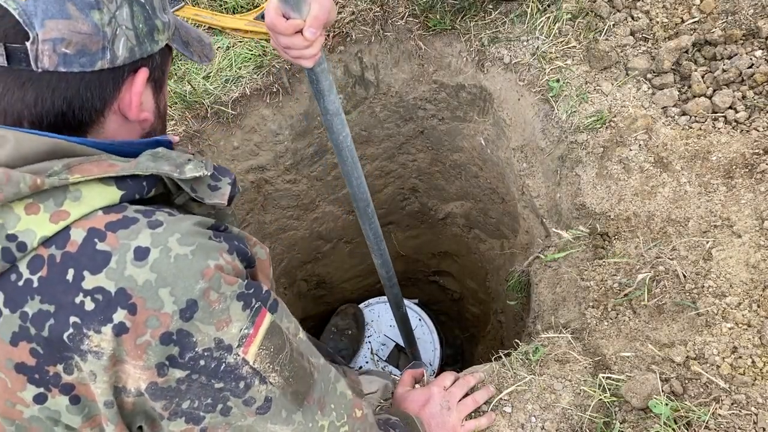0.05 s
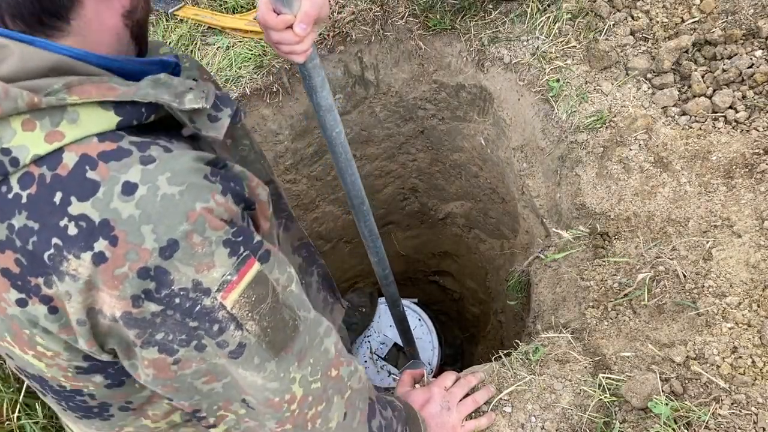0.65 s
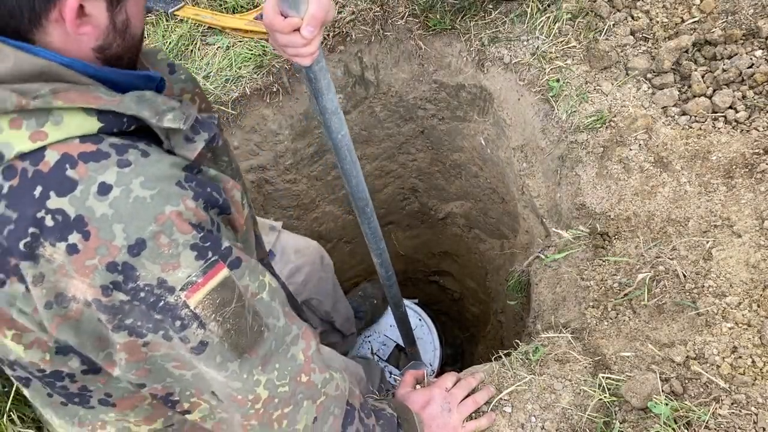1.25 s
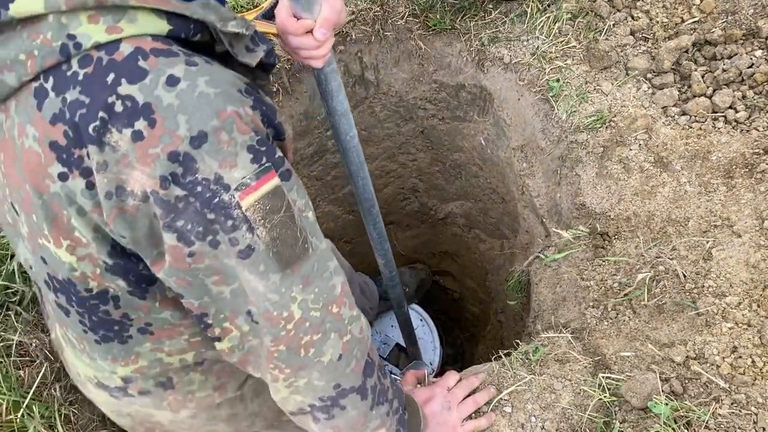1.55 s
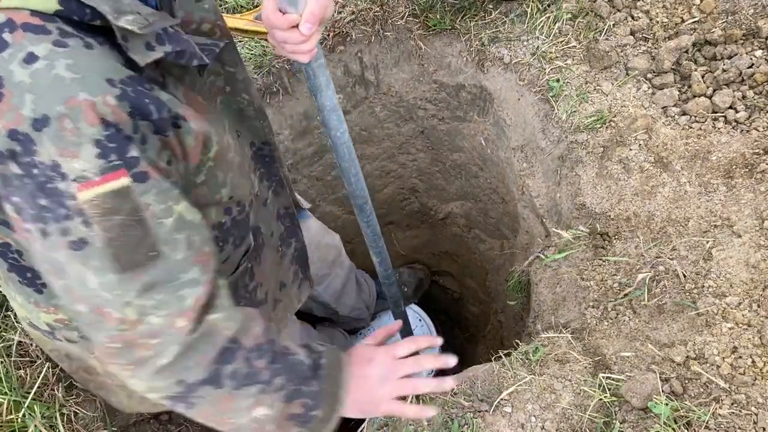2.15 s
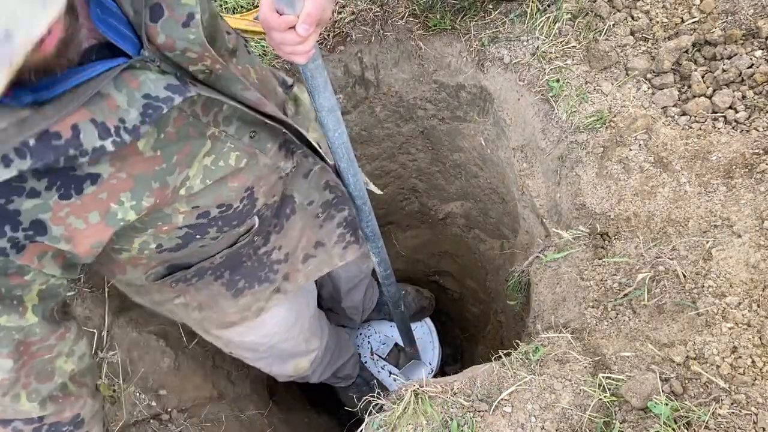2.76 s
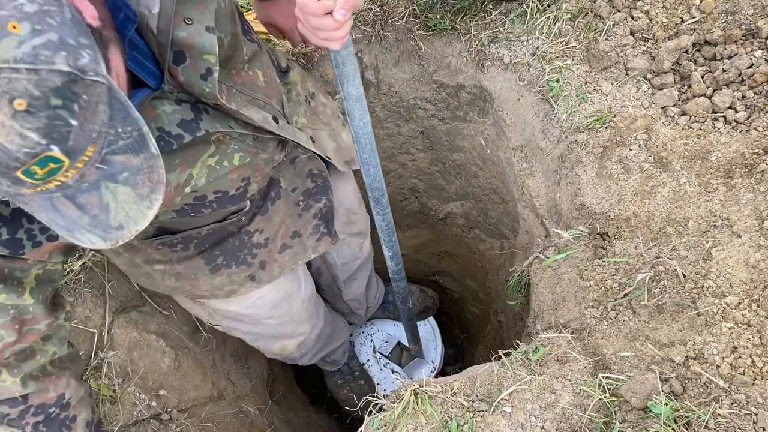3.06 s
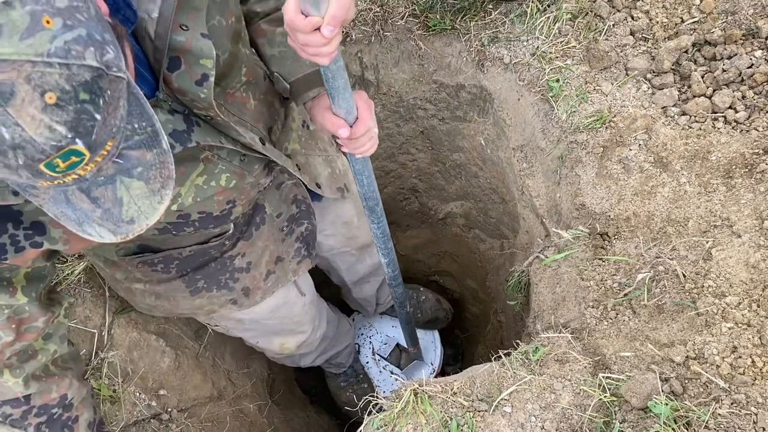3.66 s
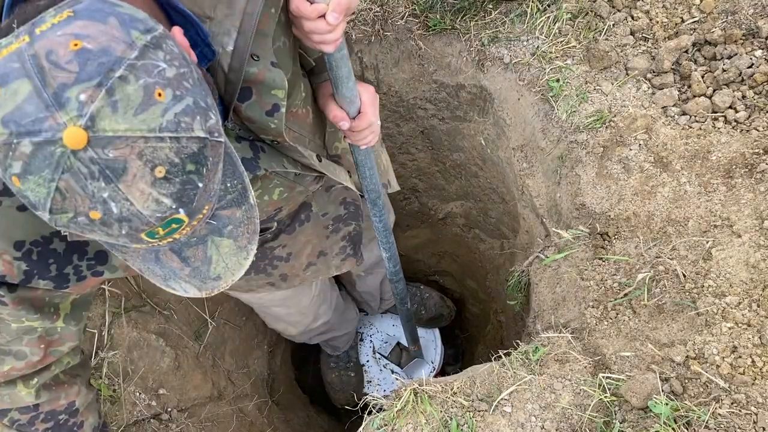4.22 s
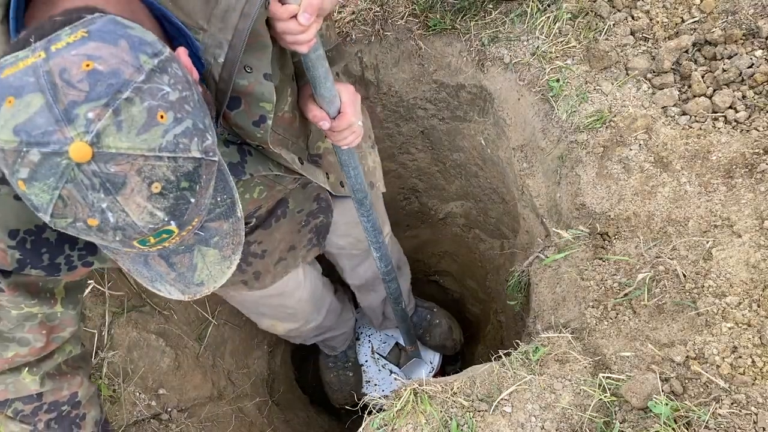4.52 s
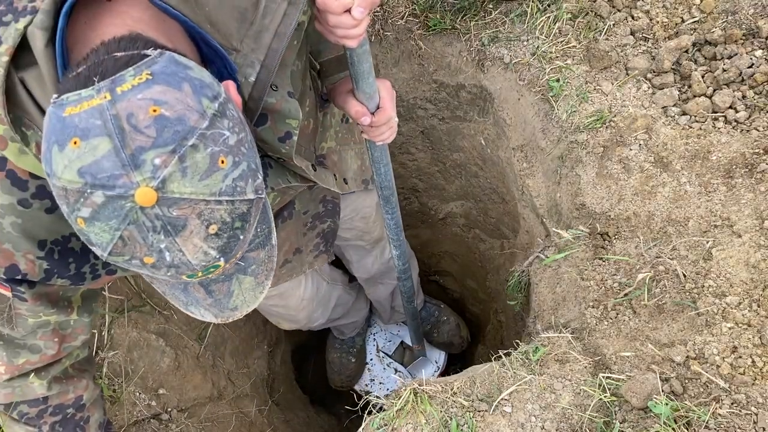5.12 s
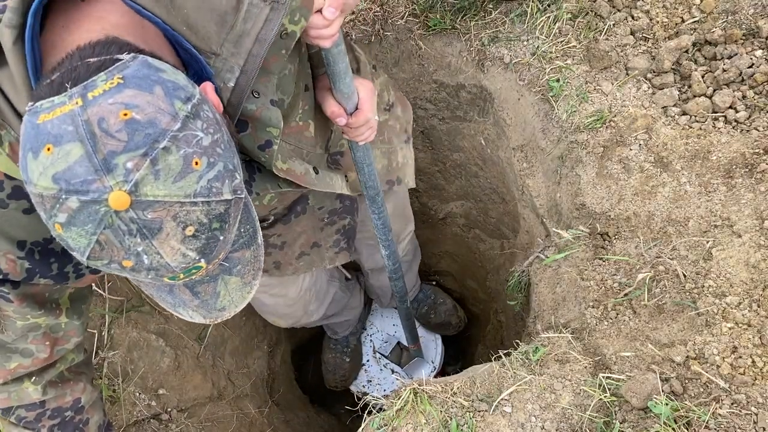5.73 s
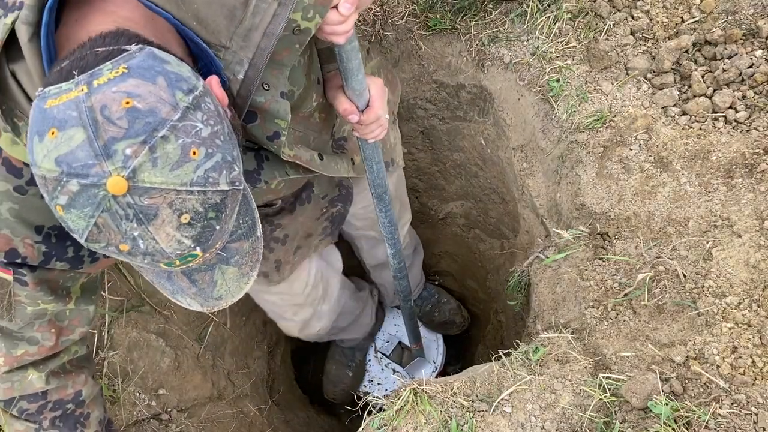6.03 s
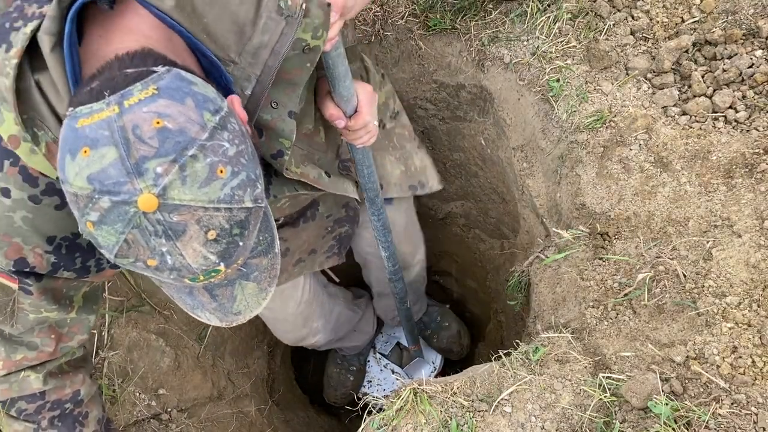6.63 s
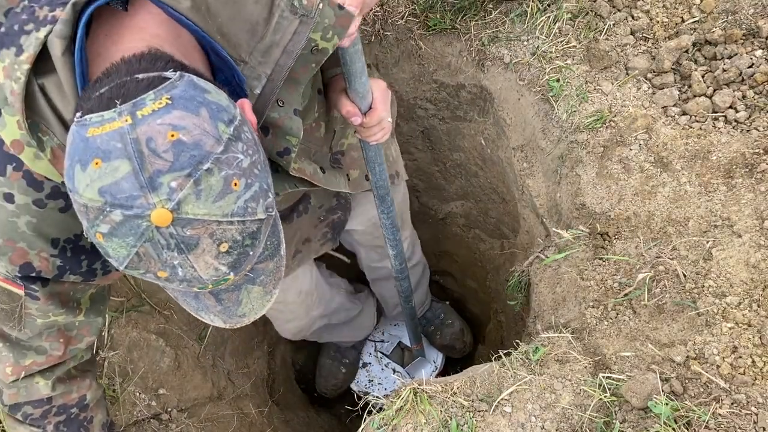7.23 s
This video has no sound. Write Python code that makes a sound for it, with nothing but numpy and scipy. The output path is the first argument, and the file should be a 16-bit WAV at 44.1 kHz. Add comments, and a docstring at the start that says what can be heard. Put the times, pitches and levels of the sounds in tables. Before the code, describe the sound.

Boots scuff and thud on dry soil in a narrow hole, with jacket rustle, hollow knocks, then three hard stamps and metal clinks.

```python
"""A man climbs down a narrow earth hole beside the steel shaft of an auger, treading on soil and its plate.
Wind or handling bumps come first. His jacket rustles, hands and boots knock and scuff, grit ticks, and low
buffeting comes and goes. After a lull at 5 s a small bird whistles twice, far away. From 6 s three hard
stamps crush the soil and set a loose metal piece jingling. The close walls add a short, hollow echo."""
import sys
import numpy as np
from scipy import signal
from scipy.fft import rfft, irfft, next_fast_len
from scipy.io import wavfile

SR = 44100
rng = np.random.default_rng(int(sys.argv[2]) if len(sys.argv) > 2 else 0)


def persist_wave(psi):
    """Save psi, clipped to +-1, as 16-bit WAV."""
    counts = np.round(np.clip(psi, -1, 1) * 32767).astype(np.int16)
    wavfile.write(sys.argv[1], SR, np.atleast_2d(counts).T)


N = 325458
EVENT_S = np.arange(SR // 2) / SR  # time axis of one contact

# Low, dull thuds: wind or handling bumps at first, then body and boots.
# Each row: start in seconds, relative level in dB, final pitch in Hz.
THUDS = [(0.03, -18.5, 95), (0.135, -13.5, 143), (0.16, -11.5, 84.6), (0.186, -11.5, 66.5),
         (0.234, -16, 103), (0.31, -11.5, 76), (0.457, -18.5, 77.6), (0.505, -23, 100), (0.612, -21.5, 107),
         (0.666, -22.5, 60.6), (0.779, -35.5, 63.4), (1.087, -26, 74), (1.241, -15, 121.5),
         (1.281, -27.5, 68), (1.564, -20.5, 55), (1.786, -23.5, 92), (1.87, -23.5, 62), (1.922, -12.5, 112),
         (1.995, -26, 52), (2.091, -27, 84.6), (2.157, -21.5, 86.5), (2.178, -18.5, 130), (2.404, -38, 98),
         (2.473, -34.5, 107), (2.529, -28, 106), (2.651, -22.5, 100), (2.713, -20, 80), (2.783, -23, 80),
         (2.845, -27, 90), (2.909, -17, 101.3), (3.159, -20.5, 98.4), (3.536, -25, 110), (3.575, -20.5, 82),
         (3.676, -16, 100), (3.841, -18, 108.5), (3.946, -26.5, 68.5), (4.038, -28.5, 69.4),
         (4.125, -21, 124.6), (4.201, -24.5, 88.5), (4.244, -25, 93), (4.349, -24.5, 138.6),
         (4.448, -15, 171), (4.562, -28.5, 158), (4.596, -24, 73), (4.679, -23.5, 66), (4.85, -28.5, 69),
         (5.34, -27.5, 176), (5.485, -29, 70), (5.568, -23, 156.3), (5.64, -30, 61), (5.73, -33, 59),
         (6.062, -13.5, 74), (6.176, -27, 66.6), (6.547, -18.5, 130), (6.584, -12.5, 157.6),
         (6.757, -28.5, 170), (6.964, -39.5, 113), (7.082, -9, 68.6), (7.203, -40, 168), (7.262, -32, 161)]
# Spectrum of breaking dry soil. Each row: frequency in Hz, gain in dB.
SOIL_SPECTRUM = [(200, -73), (500, 6.5), (900, 8), (1650, 2), (3000, 3), (4600, -6), (7000, -23),
                 (15000, -38)]


def stamps(level_db=-3, rise_cycles=0.73, rise_s=0.00092, grit_above_hz=2500, usual_grit_db=-21):
    """A boot crushes crumbs first; the bass builds later and lasts longer, then loose soil settles."""
    # Two or three stages a stamp. Each row: start in seconds, level in dB, grit in dB, decay time factor.
    stages = [(6.043, -11, -19, 0.59), (6.056, -11, -19.5, 0.5), (6.071, -21, -45, 0.99),
              (6.578, -5.5, -27, 0.65), (6.593, -8.5, -21.5, 0.51), (6.607, -15.5, -12, 1),
              (7.073, -1, -22, 0.77), (7.085, -10.5, -28, 1)]
    # Each row: band centre in Hz, gain in dB.
    spectrum = [(65, -24), (92, -26), (130, -10.5), (184, -9), (260, -16.5), (370, -9.5), (520, -7),
                (740, -13), (1500, -14), (2900, -23.5), (4200, -25), (5900, -32), (8400, -22.5),
                (16000, -28)]
    spectrum_hz, spectrum_db = np.transpose(spectrum)
    centres_hz = 65 * np.sqrt(2) ** np.arange(17)
    bands_db = np.interp(np.log(centres_hz), np.log(spectrum_hz), spectrum_db)
    settling = amp(-28) * decay(0.57)
    out = np.zeros(N)
    for hz, band_db in zip(centres_hz, bands_db):
        rise = 1 - np.exp(-EVENT_S / (rise_cycles / hz + rise_s))
        base_t60_s = 0.092 * (1000 / hz) ** 0.066
        for start_s, db, grit_db, length in stages:
            envelope = rise ** 2 * (decay(base_t60_s * length) + settling)
            crush = band(crumbly(3.9, 418.3), hz / 2 ** 0.25, hz * 2 ** 0.25)
            treble_db = grit_db - usual_grit_db if hz > grit_above_hz else 0
            add(out, start_s, amp(db + level_db + band_db + treble_db) * shaped(crush, envelope))
    return out


def thuds(level_db=-4, glide=0.47, glide_s=0.0069, swell_s=0.013):
    """Low, dull thuds that sink in pitch: wind or handling bumps at first, then body and boots."""
    out = np.zeros(N)
    for start_s, db, hz in THUDS:
        pitch_hz = hz * (1 + glide * np.exp(-EVENT_S / glide_s))
        tone = np.sin(2 * np.pi * (np.cumsum(pitch_hz) / SR + rng.random()))
        thump = shaped(tone, swell(swell_s) ** 2)
        low_noise = shaped(band(crumbly(0.2, 120), 108, 234), swell(swell_s * 0.5))
        add(out, start_s, amp(db + level_db) * (thump + amp(-9) * low_noise))
    return out


def knocks(level_db=-4, usual_db=-18, usual_swell_s=0.0034):
    """Bumps on wall and auger: a crack of grit, a crunch, then two hollow notes set by the place struck."""
    # Each row: start in seconds, level in dB, lower and upper note in Hz,
    # then relative levels of upper note, crunch and crack in dB.
    bumps = [(0.131, -26.5, 423, 640, -10, -29, -34), (0.189, -26, 390, 530, -8, -39, -34),
             (0.481, -26.5, 443, 645, -14, -19, -18), (0.68, -22, 473, 716, 1, 5, -16),
             (1.224, -13.5, 477, 647, -25, -12, -23), (1.24, -3.5, 475, 624, -5.5, -15.5, -25),
             (1.361, -26, 478, 650, -19, -13, -17), (1.42, -16.5, 410, 646, -14, -10, -15),
             (1.58, -16, 473, 710, 1.5, 5, -4.5), (1.737, -16.5, 436, 617, -8.5, -19, -31),
             (2.007, -32.5, 330, 423, -3.5, -30, -34), (2.177, -30, 323, 465, -9, -31, -36),
             (2.510, -28, 595, 844, -3.5, -12, -13), (2.61, -27.5, 500, 665, -11, -16, -21),
             (2.775, -21.5, 461, 667, -7.5, -5, -17), (3.049, -30, 414, 600, -8, -19, -30),
             (3.582, -32.5, 497, 710, -18, -24, -1.5), (3.65, -28, 453, 690, -7, -11, -24),
             (3.67, -16.5, 455, 690, -20, -8, -39), (3.847, -26, 383, 484, -26, -33, -41),
             (3.885, -31.5, 470, 653, -13, -14, -24), (3.923, -30.5, 457, 710, -9, -10.5, -14.5),
             (4.136, -31.5, 400, 543, -6, -27, -29), (4.353, -21, 497, 684, -10.5, -28, -23),
             (4.424, -23.5, 452, 614, -21, -28, -17), (4.452, -18, 467, 657, -3.5, -6, -12),
             (4.552, -26, 435, 578, 0, -28, -34), (4.566, -23.5, 413, 730, -10, -12, -20),
             (4.63, -35, 453, 630, -13, -20, -21), (5.34, -28.5, 443, 550, -16, -32, -25),
             (5.571, -23.5, 433, 616, -15, -4, -12), (6.047, -7, 475, 613, -5, -33, -35),
             (6.548, -28, 414, 553, -4, -16, -34), (7.157, -19, 460, 656, -18, -22, -30)]
    out = np.zeros(N)
    for start_s, db, lower_hz, upper_hz, upper_db, crunch_db, crack_db in bumps:
        swell_s = usual_swell_s * amp(0.15 * (usual_db - db))  # harder knocks are shorter
        body = amp(-10) * shaped(band(crumbly(1.3, 242), 313, 520), swell(swell_s * 2.5))
        for hz, note_db in [(lower_hz, -2), (upper_hz, upper_db)]:
            body += amp(note_db) * shaped(sine(hz), swell(swell_s))
        crunch = shaped(band(crumbly(0.5, 450), 290, 1780), swell(swell_s * 0.7))
        crunch = shaft_ring(crunch, hollow_db=-27)
        crack = shaped(band(crumbly(1.0, 1250), 1200, 8500), swell(swell_s * 0.5))
        hit = body + amp(crunch_db) * crunch + amp(crack_db - 1) * crack
        add(out, start_s, amp(db + level_db) * hit)
    return out


def clinks(clash_db=-1, crunch_db=-10, flutter_db=7.5, settle_t60_s=1.3):
    """Metal jolts against metal with soil between: a bright clash, a crunch and a thin high ring."""
    # Each row: start in seconds, level in dB, relative ring level in dB.
    jolts = [(0.05, -37, -1), (0.637, -38, -1), (0.7076, -33.5, -3), (1.1695, -25.5, -2), (6.15, -36.5, -6),
             (6.6796, -13, 3.5), (6.6941, -20, -17), (6.7292, -23, -6), (7.146, -16.5, -26),
             (7.158, -16, 6.5), (7.175, -48, -20)]
    # Each row: frequency in Hz, level in dB, T60 in seconds.
    metal_modes = [(4600, -20, .06), (8134, -35, .75), (8204, -21, .13), (8285, -25, .19), (8365, -17, .11),
                   (8425, -24, .23), (8490, -13, .11), (8570, -11, .09), (8823, -22, .07),
                   (9771, -20, .045), (10370, -19, .06), (11490, -17, .05)]
    # Each row: frequency in Hz, gain in dB.
    clash_spectrum = [(300, -28), (1400, 11), (2100, -19), (2800, 8), (3700, 5), (4600, 12), (5400, 2.5),
                      (6500, 2), (7500, 3), (8400, 10), (11000, 7), (12500, 4), (16000, -9)]
    clash_envelope = decay(0.048) + amp(-18) * decay(0.073)
    unevenness_db = flutter_db * decay(settle_t60_s)  # the loose piece keeps touching until it settles
    out = np.zeros(N)
    for start_s, db, ring_db in jolts:
        clash = shaped(coloured(crumbly(1.0, 500), clash_spectrum), clash_envelope)
        crunch = shaped(band(crumbly(1.5, 474), 400, 2300), swell(0.0046))
        ring = np.zeros(len(EVENT_S))
        for hz, mode_db, t60_s in metal_modes:
            mode = amp(mode_db + rng.normal(0, 0.67)) * sine(hz) * decay(t60_s)
            ring += mode * amp(unevenness_db * drift(92, len(EVENT_S)))
        clink = amp(clash_db) * clash + amp(crunch_db) * crunch + amp(ring_db) * ring
        add(out, start_s, amp(db) * clink)
    return out


def scuffs(level_db=-2):
    """A brief slip breaks a cluster of soil grains; the nearer the auger, the more its shaft rings."""
    # Each row: start in seconds, level in dB, swell time in seconds, relative shaft ring in dB.
    slips = [(0.054, -38, 0.0068, -6), (0.58, -43.5, 0.0088, 2), (0.640, -30, 0.0045, -6),
             (0.936, -41.5, 0.0026, 0), (1.011, -32.5, 0.0036, 3.5), (1.041, -35.5, 0.0033, -3),
             (1.083, -36.5, 0.0023, 3), (1.102, -42, 0.0022, 6), (1.14, -42, 0.0036, -3),
             (1.281, -40, 0.0025, -4), (1.626, -37, 0.0021, -2), (2.104, -35.5, 0.001, 0),
             (2.243, -29.5, 0.0037, 24), (2.251, -36, 0.0018, 27), (2.289, -41.5, 0.0021, -14),
             (2.35, -42, 0.0025, 0), (2.465, -43, .003, 0), (2.508, -27, 0.0039, -1.5),
             (2.519, -34, 0.0028, 6), (2.605, -30.5, 0.005, 8), (2.938, -44.5, 0.0031, 15),
             (3.053, -33.5, 0.0029, 2), (3.267, -42.5, 0.0022, 1), (3.327, -42.5, 0.0025, 13),
             (3.404, -40.5, 0.0018, 1), (3.573, -36, 0.0032, -8), (3.717, -43, 0.0056, -18),
             (3.764, -39, 0.0022, 5), (3.883, -37, 0.0015, -8), (4.566, -37, 0.0025, 7),
             (4.603, -35, 0.0021, -6), (4.68, -46, 0.0023, -11), (4.707, -46.5, 0.0036, -1),
             (4.767, -51, 0.0047, 12), (4.826, -48, 0.0034, 19), (4.88, -50, 0.0077, 17),
             (5.093, -55.5, 0.0029, 2), (5.574, -46, 0.0015, -2), (6.125, -29.5, 0.0022, 24),
             (6.631, -34, 0.015, 8)]
    out = np.zeros(N)
    for start_s, db, swell_s, hollow_db in slips:
        slip = shaped(coloured(crumbly(4.5, 640), SOIL_SPECTRUM), swell(swell_s))
        add(out, start_s, amp(db + level_db) * shaft_ring(slip, hollow_db))
    return out


def shaft_ring(contact, hollow_db, spread_octaves=0.022):
    """A contact excites the steel shaft's hollow ring; the blend keeps the overall level."""
    # Each row: frequency in Hz, level in dB, T60 in seconds.
    shaft_modes = [(1213, 7.5, 0.022), (1500, 11.5, 0.021), (1697, 11, 0.043), (1886, -10.5, 0.093),
                   (2630, -22.5, 0.5), (3500, -11, 0.027)]
    detune = 2 ** (spread_octaves * rng.standard_normal())  # the grip varies from touch to touch
    response = sum(amp(db) * np.cos(2 * np.pi * hz * detune * EVENT_S) * decay(t60_s)
                   for hz, db, t60_s in shaft_modes)
    hollow = band(signal.fftconvolve(contact, response)[:len(contact)], 890, 4500) * contact.std()
    return (contact + amp(hollow_db) * hollow) / np.hypot(1, amp(hollow_db))


def ticks(level_db=-2, swell_s=0.0017, tail_db=-20, tail_t60_s=0.15):
    """Single bits of grit snap."""
    # Each row: start in seconds, level in dB.
    snaps = [(0.297, -36), (0.386, -40.5), (0.407, -37), (0.455, -32.5), (0.604, -41), (1.051, -39.5),
             (1.649, -38), (1.703, -35), (2.027, -48), (2.71, -40), (2.762, -34), (2.776, -35.5),
             (2.876, -41), (3.104, -36.5), (3.228, -41), (3.328, -36), (3.547, -35), (3.667, -32.5),
             (4.283, -35), (4.566, -28), (4.764, -46), (5.285, -43), (5.314, -38.5), (5.619, -38.5),
             (5.991, -42.5), (6.112, -36), (6.2, -44.5), (6.289, -43), (6.599, -29), (6.631, -21.5),
             (6.853, -36), (6.982, -46), (7.123, -26), (7.229, -36), (7.362, -45)]
    # Each row: frequency in Hz, gain in dB.
    spectrum = [(500, 13.3), (2000, 11.7), (4300, 9.4), (6000, 4.5), (8000, 13), (12000, 7.7), (16000, 0.5)]
    envelope = np.e * swell(swell_s) + amp(tail_db) * decay(tail_t60_s)
    out = np.zeros(N)
    for start_s, db in snaps:
        snap = shaped(coloured(crumbly(0.4, 730), spectrum), envelope)
        add(out, start_s, amp(db + level_db) * snap)
    return out


def rustle(rub_db=2, steady_scrape_db=-3):
    """Boots rub and scrape, the jacket hisses: gently with steady effort, more with each body shift."""
    # Each row: time in seconds, steady rustle level in dB.
    effort_curve = [(0, -57.5), (0.75, -51), (0.93, -57.5), (1.3, -54.5), (1.8, -55), (1.97, -58),
                    (2.27, -56), (2.9, -55.5), (3.18, -58), (3.5, -58), (3.8, -62), (4.83, -56.5),
                    (4.97, -69), (5.13, -65.5), (5.2, -58.5), (5.45, -63), (6.0, -56.5), (6.38, -63.5),
                    (7.38, -60.5)]
    # Three spectra. Each row: frequency in Hz, gain in dB.
    rub_spectrum = [(150, -21), (300, -8), (460, 6), (650, -6), (900, -25), (2000, -35.5)]
    scrape_spectrum = [(400, 8), (850, 8), (1300, 12.5), (1750, 6), (2600, -4.5), (3600, -7.5),
                       (4600, -4.5), (6000, -31), (12000, -36)]
    cloth_spectrum = [(1000, 13), (3000, 6.5), (4600, 1.5), (5800, -0.5), (7300, 9.5), (8400, 2.5),
                      (9600, 6.5), (12000, 8), (15500, 1)]
    effort = amp(per_sample(effort_curve)[0])
    jacket, boot = body_shifts()
    rub = friction(rub_spectrum, rough_db=5.5, clumps_per_s=50, grains_per_s=34, grain_db=-3.5)
    scrape = friction(scrape_spectrum, rough_db=3, clumps_per_s=110, grains_per_s=36, grain_db=-2)
    scrape += crumbs()
    cloth = friction(cloth_spectrum, rough_db=2, clumps_per_s=79, grains_per_s=23, grain_db=-11.5)
    return (amp(rub_db) * np.hypot(effort, boot) * rub
            + np.hypot(amp(steady_scrape_db) * effort, boot) * scrape
            + np.hypot(effort, jacket) * cloth)


def body_shifts(rise=0.6, fall=0.57):
    """Each shift speeds up and slackens in a bell shape; returns jacket and boot gains."""
    # Each row: peak time in seconds, half length in seconds, jacket level in dB, boot level in dB.
    shifts = [(-0.008, 0.069, -48, -37.5), (0.243, 0.058, -49.5, -54), (0.485, 0.13, -50, -59),
              (0.685, 0.16, -67, -44), (1.095, 0.09, -52, -43.5), (1.197, 0.031, -48, -40),
              (1.48, 0.31, -51.5, -52), (1.767, 0.2, -53, -49), (2.365, 0.12, -51, -55),
              (2.578, 0.27, -50.5, -52), (2.815, 0.24, -52.5, -56), (3.086, 0.1, -54.5, -50),
              (3.377, 0.19, -48.5, -74), (3.57, 0.19, -46, -64), (3.948, 0.34, -54, -61.5),
              (4.185, 0.12, -56.5, -51), (4.355, 0.027, -42.5, -43), (4.449, 0.037, -45, -45),
              (4.58, 0.14, -48, -50), (4.698, 0.028, -50, -76), (5.202, 0.033, -67, -49.5),
              (5.321, 0.058, -75, -52), (5.57, 0.23, -51.5, -76), (5.85, 0.11, -52.5, -73),
              (6.15, 0.083, -64, -50.5), (6.577, 0.24, -54, -55), (6.683, 0.14, -60, -40.5),
              (7.155, 0.13, -63, -38.5)]
    jacket_power, boot_power = np.zeros((2, N))
    for peak_s, half_s, jacket_db, boot_db in shifts:
        start_s = max(0, peak_s - 0.25)
        offset_s = EVENT_S + start_s - peak_s
        width_s = half_s * np.where(offset_s < 0, rise, fall)
        bell = np.exp(-2 * (offset_s / width_s) ** 2)
        add(jacket_power, start_s, amp(jacket_db) ** 2 * bell)
        add(boot_power, start_s, amp(boot_db) ** 2 * bell)
    return np.sqrt(jacket_power), np.sqrt(boot_power)


def friction(spectrum, rough_db, clumps_per_s, grains_per_s, grain_db, grain_s=0.0016):
    """Sliding contact: an uneven hiss with sparse, sharper grains."""
    grains = impulses(grains_per_s, spread_db=3.5, cap_db=10.5)
    envelope = signal.lfilter([1], [1, -np.exp(-1 / (grain_s * SR))], grains + 1e-18)
    snaps = rms_one(envelope * rng.standard_normal(N))
    hiss = rms_one(crumbly(rough_db, clumps_per_s, size=N))
    return rms_one(coloured(hiss + amp(grain_db) * snaps, spectrum))


def crumbs(level_db=-0.5, breaks_per_s=34, swell_s=0.0018):
    """Dry crumbs break one by one under the sliding boot."""
    breaks = impulses(breaks_per_s, spread_db=2.5, cap_db=5)
    envelope = signal.fftconvolve(breaks, np.e * swell(swell_s))[:N]
    return amp(level_db) * envelope * rms_one(coloured(crumbly(2.0, 700, size=N), SOIL_SPECTRUM))


def hole(sound, echo_swell_s=0.004):
    """The air in the hole rings briefly; close earth walls scatter an echo that differs left and right."""
    # Each row: frequency in Hz, gain in dB, T60 in seconds.
    air_modes = [(176, -7.5, 0.095), (277, -10.5, 0.094), (506, -19, 0.086), (930, -7.5, 0.11),
                 (1910, -7, 0.061)]
    # Each row: frequency in Hz, gain in dB.
    scatter_spectrum = [(70, -18), (190, -7), (235, -20), (1200, -14), (2600, -4), (5200, -4), (7000, -11),
                        (15000, -11)]
    echo = rng.standard_normal(len(EVENT_S)) * swell(echo_swell_s)
    side = coloured(signal.fftconvolve(sound, echo / np.linalg.norm(echo))[:N], scatter_spectrum)
    ring = sum(amp(db) * np.cos(2 * np.pi * hz * EVENT_S) * decay(t60_s) * 2 / decay(t60_s).sum()
               for hz, db, t60_s in air_modes)
    return sound + signal.fftconvolve(sound, ring)[:N] + side * [[1], [-1]]


def buffeting(side_db=-8, aftershake_db=-9.5, aftershake_s=0.017):
    """Lumpy stereo rumble that comes and goes, and wells up after each thud."""
    # Each row: time in seconds, relative level in dB.
    level_curve = [(0, -32), (0.25, -25), (0.6, -29), (0.85, -50.5), (1.2, -48), (1.3, -38), (2.15, -40),
                   (2.38, -48.5), (2.6, -40), (2.8, -32), (3.3, -43), (3.6, -39), (4.0, -38.5), (4.4, -31),
                   (4.72, -33.5), (5.0, -51.5), (5.3, -49.5), (5.6, -37.5), (6.0, -44.5), (6.42, -54),
                   (7.38, -47)]
    # Each row: frequency in Hz, gain in dB.
    spectrum = [(20, -36), (40, 3), (62, 11), (110, 3.5), (180, -3.5), (280, -24.5), (600, -74)]
    power = amp(per_sample(level_curve)[0] + 1) ** 2
    for start_s, db, _ in THUDS:
        add(power, start_s, (amp(db + aftershake_db) * np.e * swell(aftershake_s)) ** 2)
    mid, side = (rms_one(coloured(crumbly(4.8, 24, size=N), spectrum)) for _ in range(2))
    return np.sqrt(power) * (mid + amp(side_db) * side * [[1], [-1]])


def bird():
    """A distant thin whistle falling in two steps, then a soft, blurred, nearly level one."""
    # One curve a whistle. Each row: time in seconds, pitch in Hz, level in dB.
    whistles = [
        [(5.70, 7740, -67), (5.735, 7000, -58), (5.77, 5320, -72), (5.82, 5330, -66), (5.85, 4980, -68),
         (5.91, 3710, -56), (5.975, 3660, -70), (6.0, 3700, -83)],
        [(6.33, 3005, -67), (6.40, 3350, -68), (6.47, 3200, -71), (6.52, 3150, -82)],
    ]
    # Unsteadiness of each whistle as a fraction of its pitch.
    wavers = [0.00304, 0.02]
    time_s = np.arange(N) / SR
    out = np.zeros(N)
    for whistle, waver in zip(whistles, wavers):
        hz, db = per_sample(whistle)
        sounding = (time_s > whistle[0][0]) & (time_s < whistle[-1][0])
        pitch_hz = hz * (1 + waver * drift(310, N))
        out += sounding * amp(db) * np.sin(2 * np.pi * np.cumsum(pitch_hz) / SR)
    return out


def still_air(level_db=-63):
    """Faint steady noise, independent left and right."""
    # Each row: frequency in Hz, gain in dB.
    spectrum = [(18, 8), (30, 8), (132, -13), (234, 8), (680, 8.5), (5580, -42)]
    return amp(level_db) * np.array([rms_one(coloured(rng.standard_normal(N), spectrum)) for _ in range(2)])


def amp(db):
    """Decibels to gain."""
    return 10 ** (np.asarray(db) / 20)


def rms_one(x):
    """Scale to unit rms."""
    return x / np.sqrt(np.mean(x ** 2) + 1e-20)


def per_sample(curve):
    """Each value column of a time curve at every sample."""
    times_s, *columns = np.transpose(curve)
    return [np.interp(np.arange(N) / SR, times_s, column) for column in columns]


def coloured(x, spectrum):
    """Filter by (Hz, dB) points."""
    hz, db = np.transpose(spectrum)
    bins_hz = np.fft.rfftfreq(len(x), 1 / SR)
    return irfft(rfft(x) * amp(np.interp(np.log(bins_hz + 1), np.log(hz), db)), len(x))


def band(x, low_hz, high_hz):
    """Causal band-pass, unit rms."""
    edges_hz = [low_hz, min(high_hz, SR * 0.45)]
    return rms_one(signal.sosfilt(signal.butter(2, edges_hz, "band", fs=SR, output="sos"), x))


def sine(hz):
    """Tone at a random phase."""
    return np.sin(2 * np.pi * (hz * EVENT_S + rng.random()))


def drift(knots_per_s, size):
    """Straight lines between unit Gaussian values."""
    knots = rng.standard_normal(4096)
    return np.interp(np.arange(size) * knots_per_s / SR, np.arange(len(knots)), knots)


def crumbly(rough_db, clumps_per_s, size=SR // 2):
    """Noise in clumps, as grains and fibres catch and let go."""
    return rng.standard_normal(size) * amp(rough_db * drift(clumps_per_s, size))


def impulses(per_s, spread_db, cap_db):
    """Clicks of random time and size."""
    sizes_db = np.minimum(spread_db * rng.exponential(1, N), cap_db)
    return amp(sizes_db) * (rng.random(N) < per_s / SR)


def shaped(x, envelope):
    """Put x under an envelope, with rms about 1 at the top."""
    envelope = envelope / envelope.max()
    return rms_one(x * envelope) * np.sqrt(np.mean(envelope ** 2))


def swell(rise_s):
    """Force of a yielding contact: builds to 1/e, then relaxes."""
    progress = EVENT_S / max(rise_s, 0.0005)
    return progress * np.exp(-progress)


def decay(t60_s):
    """Free decay."""
    return amp(-60 * EVENT_S / t60_s)


def add(out, start_s, sound):
    """Mix a sound into out."""
    start = max(0, round(start_s * SR))
    out[start:start + len(sound)] += sound[:N - start]


def scene(pan_db=0.46):
    """Contacts, rustle and bird sound in the hole, slightly left, over still air and buffeting."""
    contacts = thuds() + knocks() + scuffs() + ticks() + stamps() + clinks()
    in_hole = hole(contacts + rustle() + bird())
    return in_hole * amp([[pan_db], [-pan_db]]) + still_air() + buffeting()


def record(dry, ceiling=1.1, cutoff_hz=15900):
    """Two microphone ports shift the treble's phase; peaks are rounded and the top is cut."""
    # Each row: frequency in Hz, lead of left over right in radians.
    port_phase = [(0, 0), (1600, .1), (2300, 1.2), (2850, 3.0), (3700, .9), (4600, .4), (5300, 1.6),
                  (6600, .2), (7400, -.4), (9100, -3.1), (11000, -6.1), (11750, -6.4), (13200, -9.3),
                  (13900, -9.5), (15400, -12.4)]
    size = next_fast_len(N + 2048)
    lead_rad = np.interp(np.fft.rfftfreq(size, 1 / SR), *np.transpose(port_phase))
    ports = irfft(rfft(dry, size) * np.exp(0.5j * lead_rad * [[1], [-1]]), size)[:, :N]
    rounded = ceiling * np.tanh(ports / ceiling)
    return signal.sosfilt(signal.ellip(10, 0.2, 70, cutoff_hz, fs=SR, output="sos"), rounded)


dry = scene()
out = record(dry)
persist_wave(out)
```